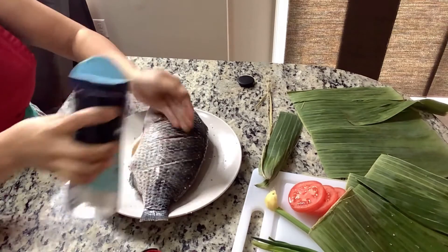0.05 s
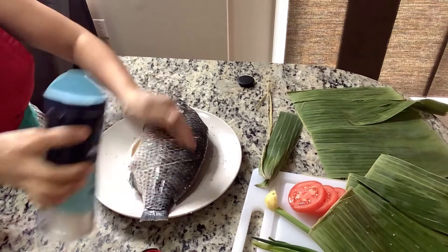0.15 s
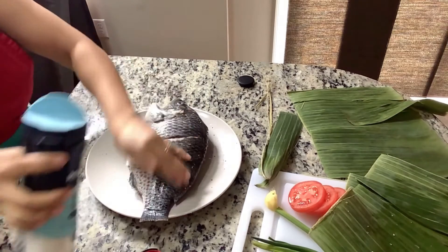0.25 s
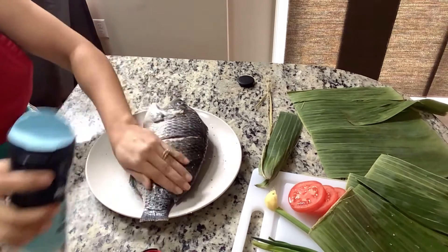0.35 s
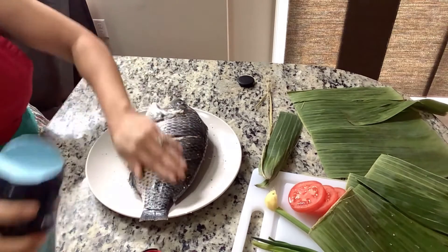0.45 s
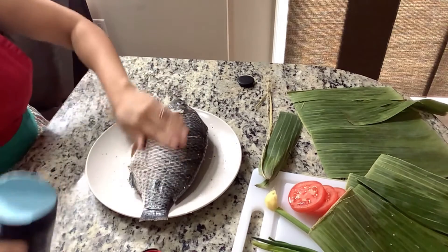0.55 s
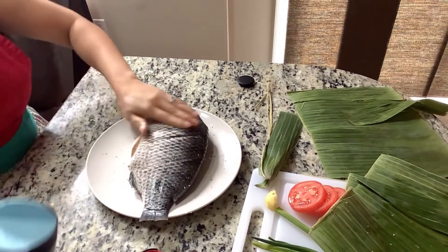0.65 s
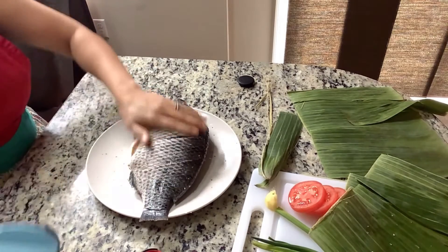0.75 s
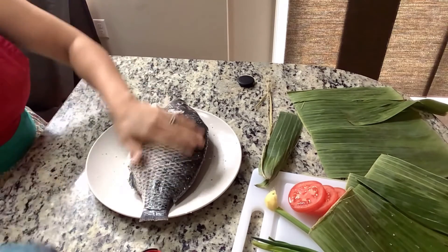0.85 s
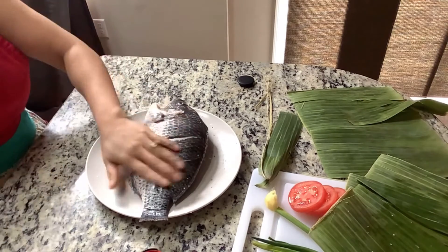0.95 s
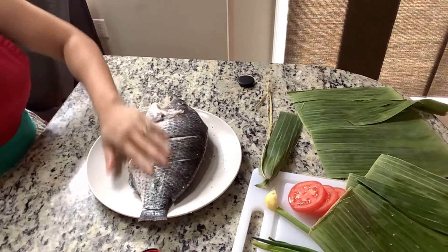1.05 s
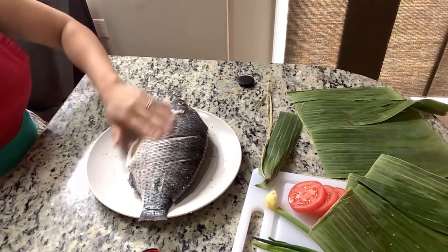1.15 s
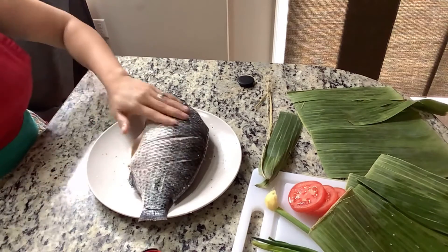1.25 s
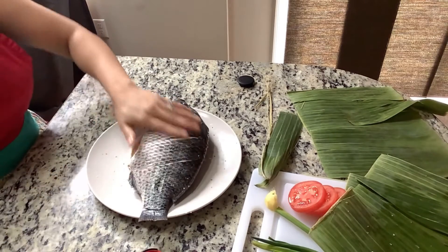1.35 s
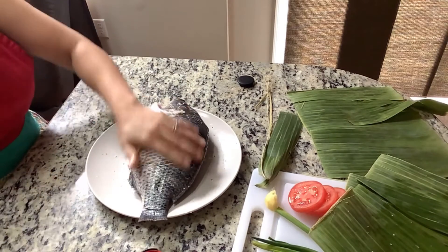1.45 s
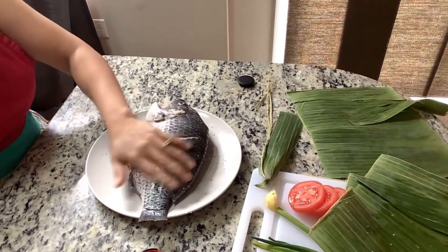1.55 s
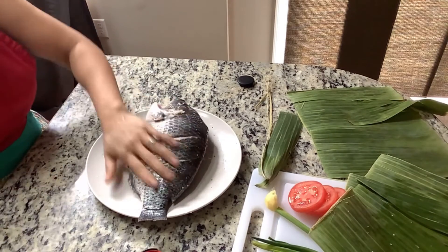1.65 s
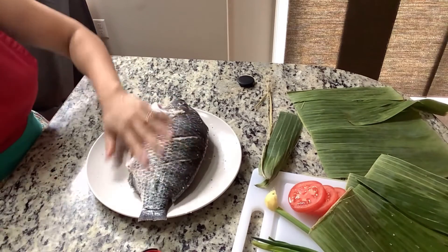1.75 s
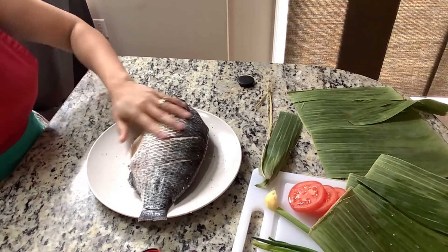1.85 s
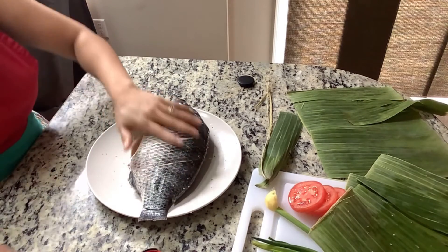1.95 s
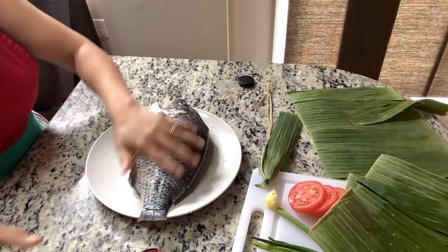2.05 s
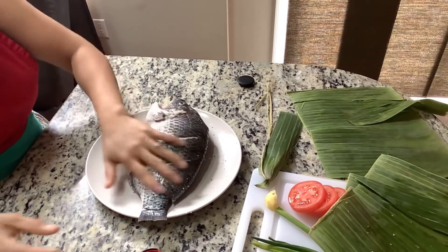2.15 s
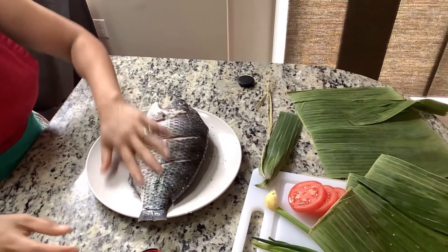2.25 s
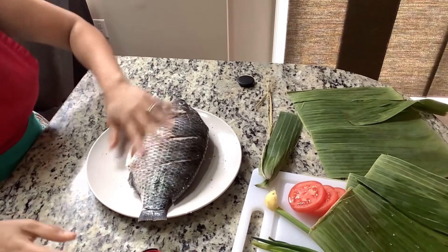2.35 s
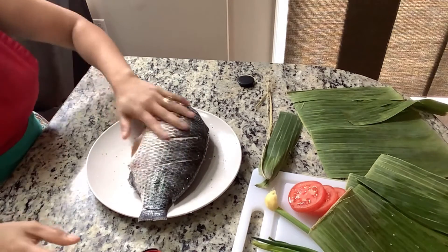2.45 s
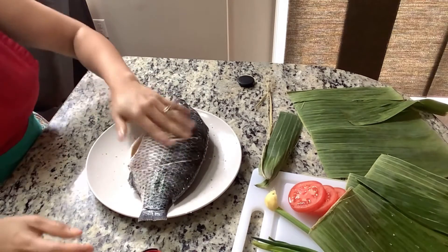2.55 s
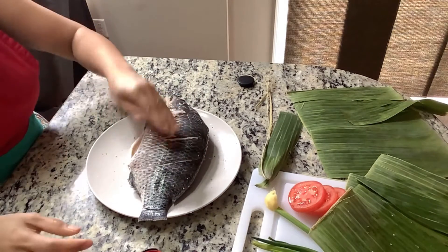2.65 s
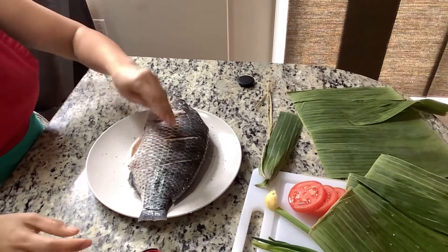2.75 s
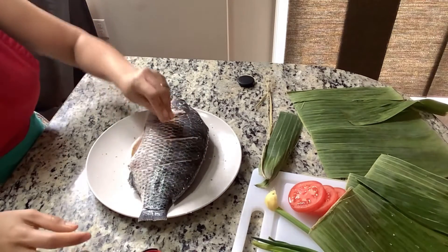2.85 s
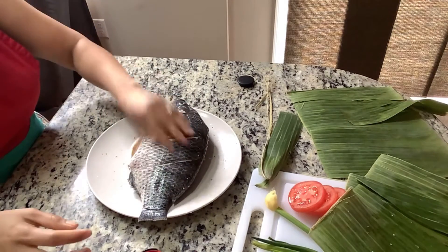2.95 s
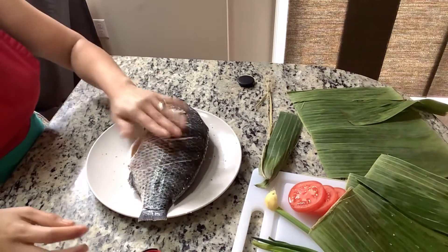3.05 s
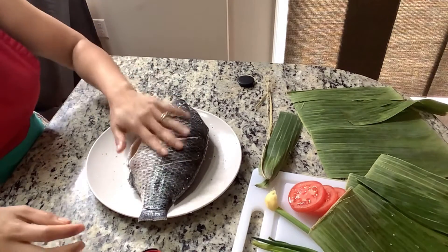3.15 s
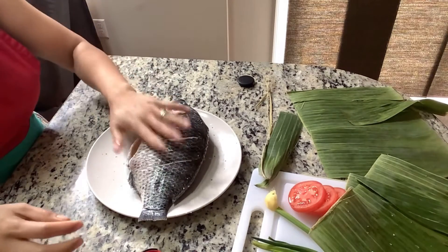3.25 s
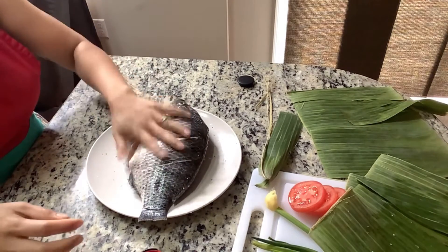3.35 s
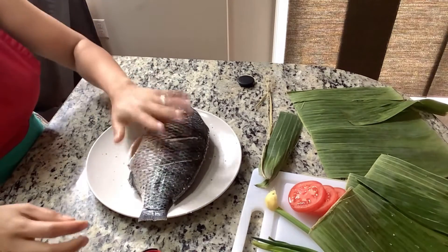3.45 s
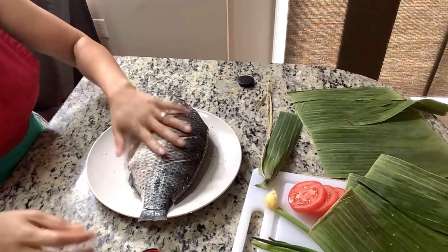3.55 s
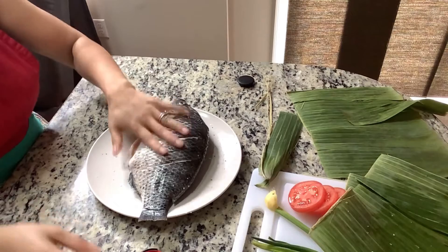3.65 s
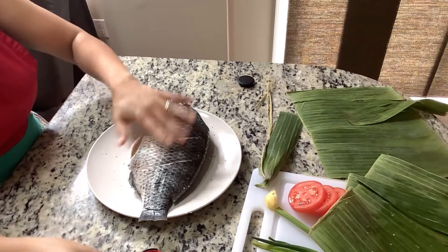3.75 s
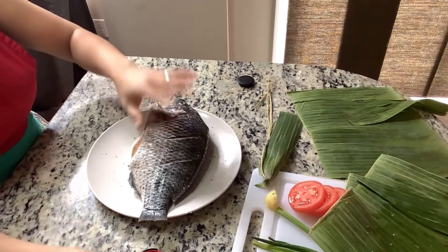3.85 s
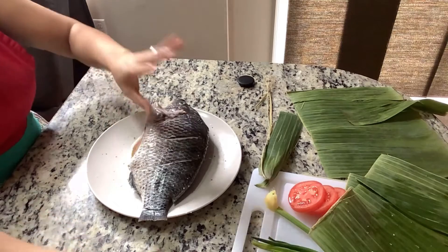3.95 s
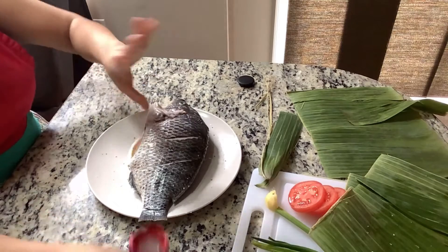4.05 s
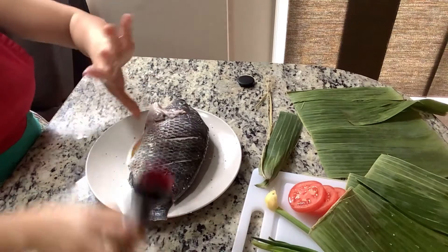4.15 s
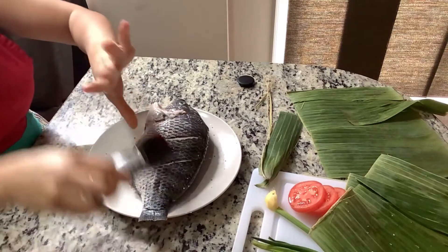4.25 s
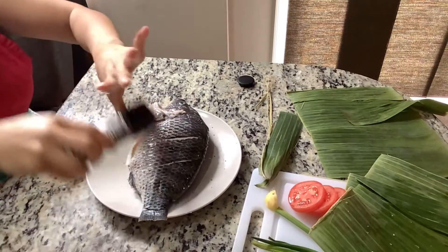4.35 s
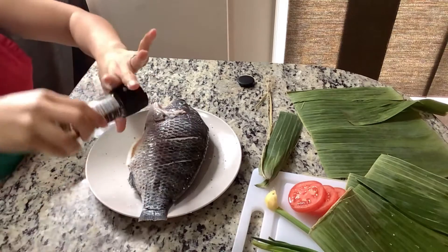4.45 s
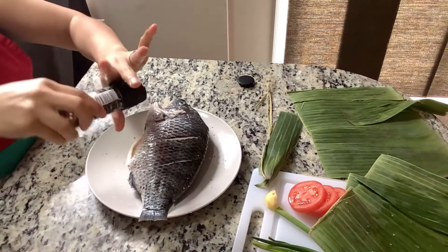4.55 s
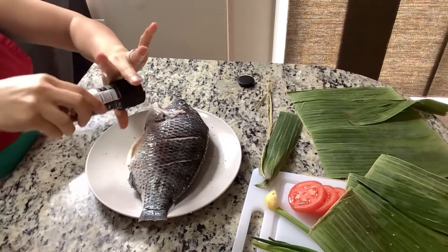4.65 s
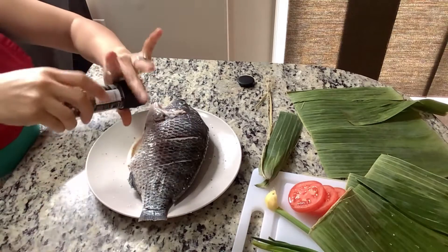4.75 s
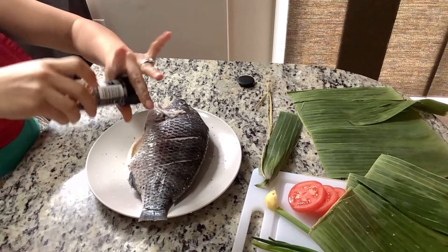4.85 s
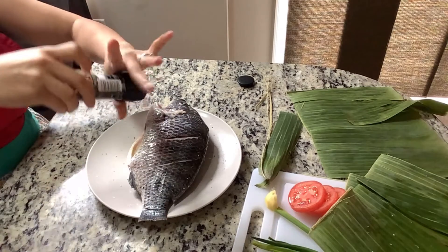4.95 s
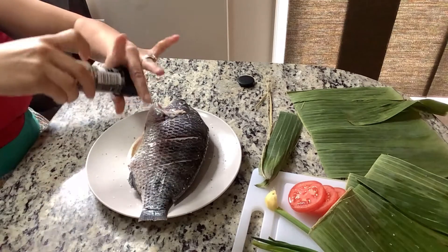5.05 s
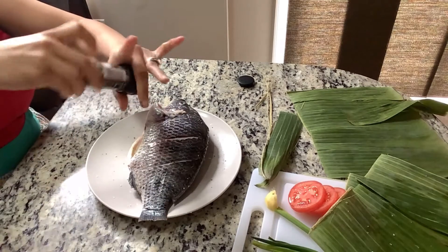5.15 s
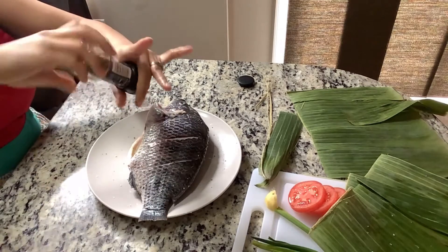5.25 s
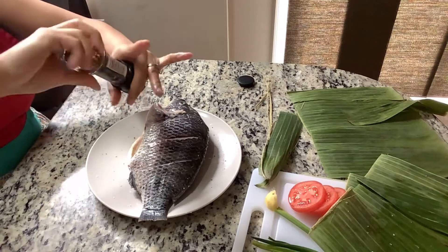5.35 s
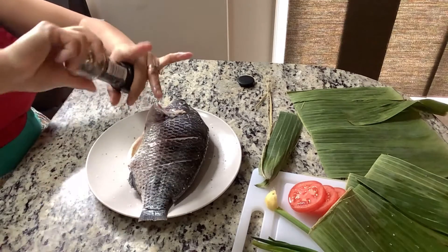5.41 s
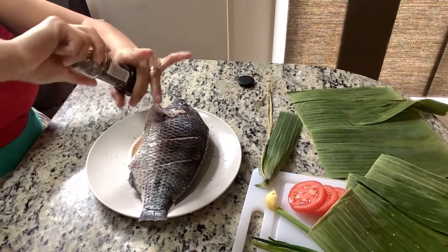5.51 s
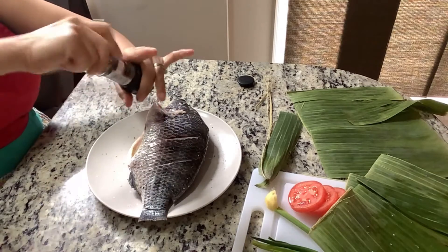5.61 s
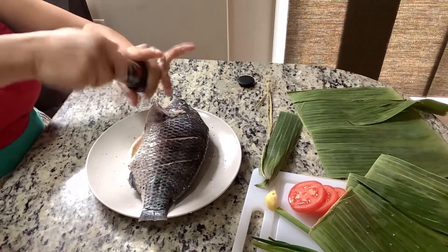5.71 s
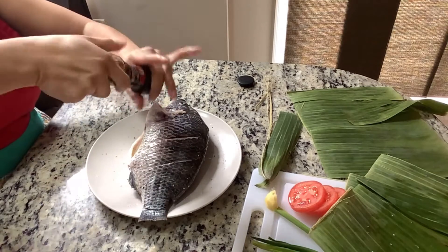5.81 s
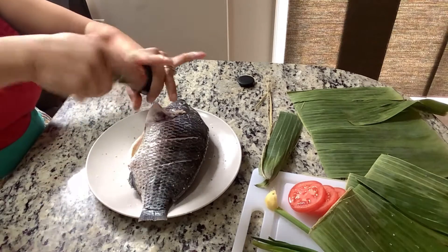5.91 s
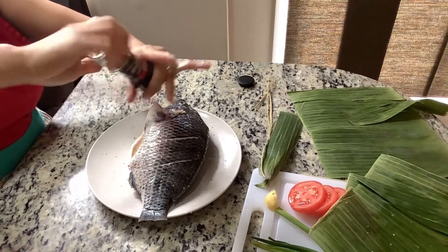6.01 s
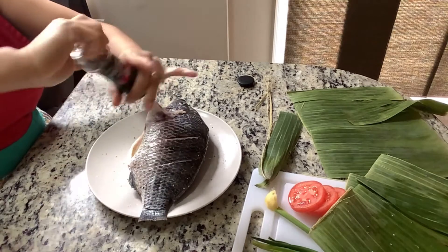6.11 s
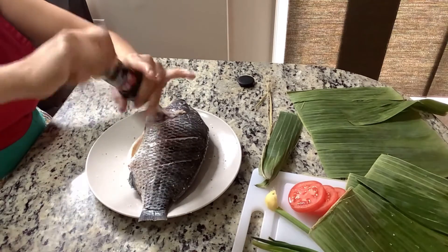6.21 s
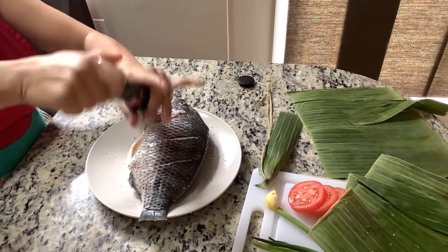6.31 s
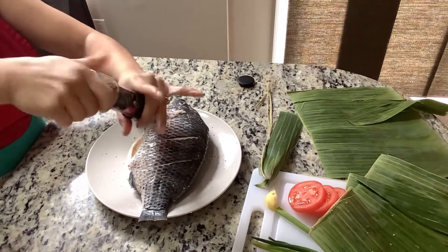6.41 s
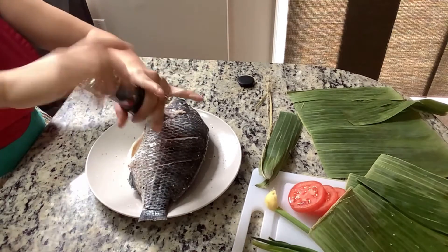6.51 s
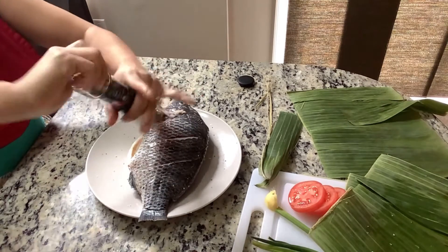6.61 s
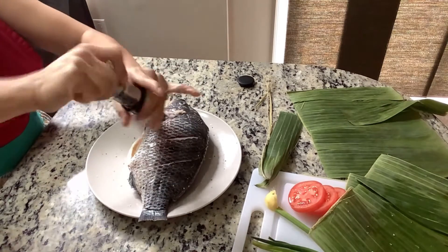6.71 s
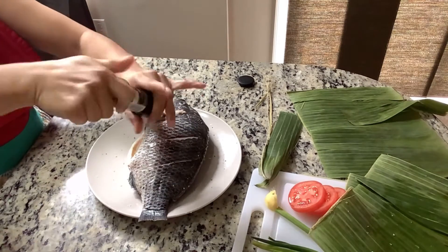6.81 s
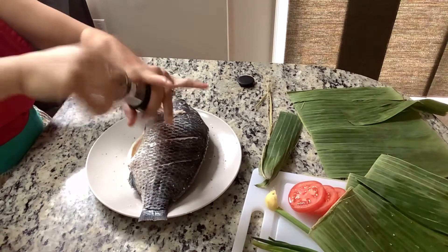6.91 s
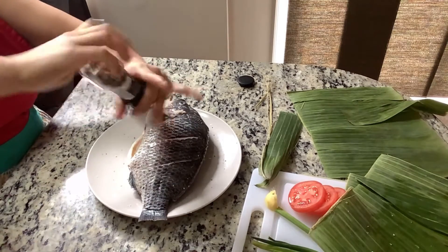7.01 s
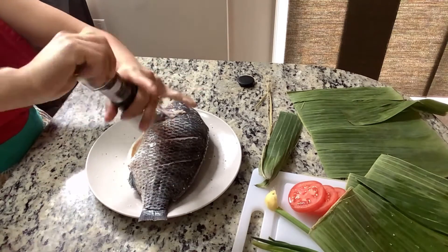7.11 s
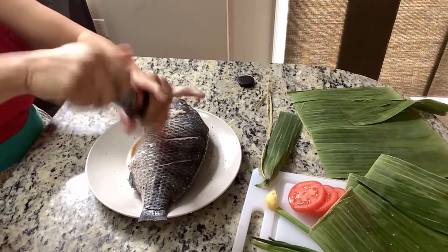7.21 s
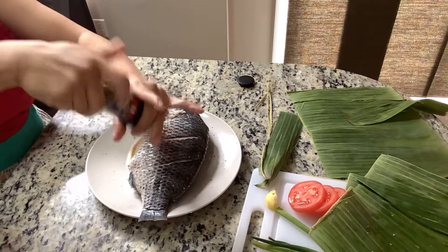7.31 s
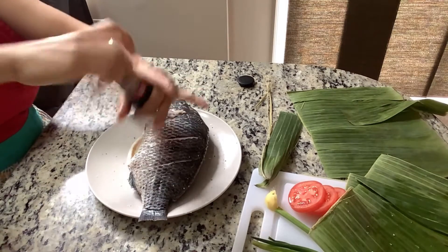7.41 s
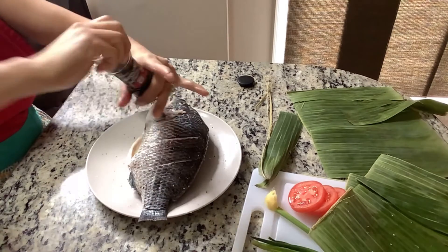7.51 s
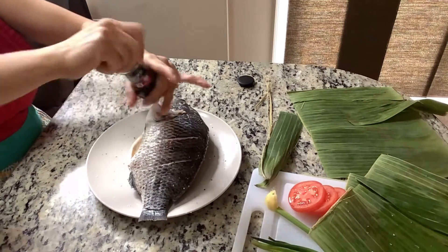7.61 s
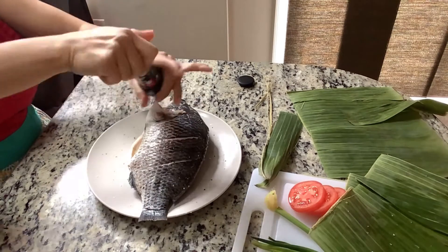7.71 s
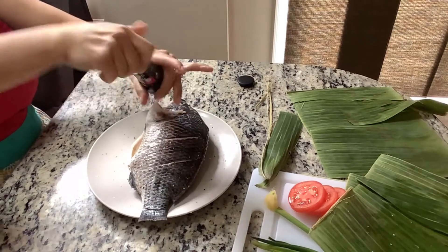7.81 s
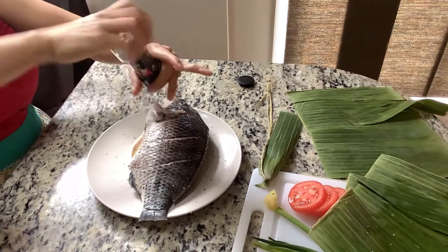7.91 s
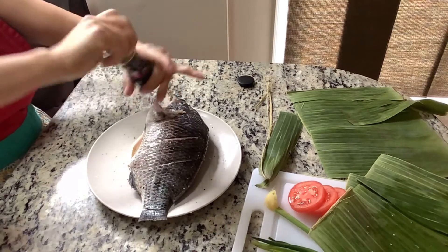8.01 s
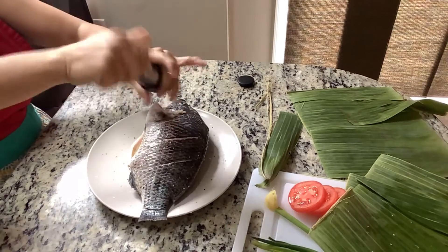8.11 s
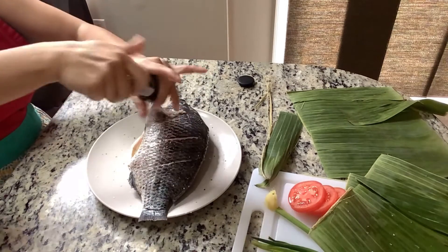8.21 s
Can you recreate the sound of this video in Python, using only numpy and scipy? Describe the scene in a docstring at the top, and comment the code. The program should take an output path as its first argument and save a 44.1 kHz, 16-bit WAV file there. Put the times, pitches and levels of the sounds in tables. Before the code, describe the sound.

A salt shaker rushes briefly, a hand pats and scratches over wet fish skin with small smacks, then a spice mill crunches in bursts, in a kitchen.

```python
"""A cook seasons a raw fish on a plate in a tiled kitchen, over wavering room air and an appliance's hum.
Salt grains trickle and rush down a shaker as it is swung upright, beside the first soft pats of damped noise.
Then a hand rubs and pats the wet skin: it squeaks, scratches over salted scales, smacks loose; things knock softly.
Last a spice mill turns, three times faintly and six times hard: corns crack one by one and crumble,
and a loose part rings. Filtered noise echoes make the hard room ring after each sound."""
import sys
import numpy as np
from scipy import signal
from scipy.fft import rfft, irfft, next_fast_len
from scipy.io import wavfile
from scipy.ndimage import uniform_filter1d, map_coordinates

SR = 44100
rng = np.random.default_rng(int(sys.argv[2]) if len(sys.argv) > 2 else 0)


def output_pcm(signal):
    """Save a mono or channel-first signal as 16-bit PCM at the path in sys.argv[1].

    Samples are clipped to [-1, 1] before scaling.
    """
    pcm = np.clip(np.atleast_2d(signal).T, -1, 1) * 32767
    wavfile.write(sys.argv[1], SR, np.round(pcm).astype(np.int16))


N = 364703

# turns of the mill; the grip sets which part rings:
# start_s, end_s, crumbling_db, ring_hz, ring_db (relative, trimmed in ringing)
MILL_TURNS = [(4.278, 4.338, -56.5, 1950, 0), (4.951, 5.049, -69, 2170, 16.5),
              (5.205, 5.342, -61, 2720, 14), (5.541, 5.705, -39.5, 2900, -4),
              (6.192, 6.292, -37, 4850, 10.5), (6.658, 6.821, -37.5, 3240, -17),
              (7.137, 7.266, -37.5, 9075, -19), (7.583, 7.686, -33, 1680, 6),
              (8.053, 8.177, -33.5, 2920, -6)]
# relative spectrum of a corn snapping: frequency_hz, gain_db
SNAP_SPECTRUM = [(200, -23.5), (700, -41), (1400, -19.5), (3000, -5), (5500, -2), (8800, 0), (12000, -2.5),
                 (15500, -9.5), (17000, -37.5)]


def amp(db):
    """Decibels to gain."""
    return 10 ** (np.asarray(db) / 20)


def unit(x):
    """Scale to rms 1."""
    return x / np.sqrt(np.mean(x ** 2) + 1e-20)


def along(points, hz):
    """Read (Hz, value) points on a log frequency axis."""
    f, v = np.transpose(points)
    return np.interp(np.log(hz + 1), np.log(f), v)


def shape(points):
    """Gain over frequency from (Hz, dB) points."""
    return lambda f: amp(along(points, f))


def peak(f, hz, width):
    """Gain of one resonance, width in Hz."""
    return f * width / np.hypot(hz * hz - f * f, f * width)


def modes(f, table):
    """Gain of a body with several resonances, summed by power."""
    return np.sqrt(sum((amp(db) * peak(f, hz, width)) ** 2 for hz, width, db in table))


def colour(x, gain):
    """Causal minimum-phase filter with the given gain over frequency, by folding the cepstrum."""
    m = 2 * next_fast_len(len(x))
    cepstrum = irfft(np.log(np.maximum(gain(np.fft.rfftfreq(m, 1 / SR)), 1e-6)))
    cepstrum[1:m // 2] *= 2
    cepstrum[m // 2 + 1:] = 0
    response = np.exp(rfft(cepstrum))
    return irfft(rfft(x, m) * response, m)[:len(x)]


def burst(life, steep=1):
    """A puff of noise that swells for about life seconds and dies, its spectrum partly evened out."""
    u = np.arange(SR // 4) / SR / life
    z = rfft(u * np.exp(-u ** steep) * rng.standard_normal(len(u)))
    return irfft(z / np.abs(z) ** .6)[:SR // 8]


def sized(x, life):
    """Scale a blow of that life to a peak near 1, by its energy."""
    return x / np.sqrt(np.sum(x ** 2) / (life * SR)) / 2


def grains(rate, spread_db):
    """Random tiny impacts of uneven size, rate a second."""
    hits = rng.random(N) < rate / SR
    size = amp(spread_db * np.clip(rng.standard_normal(N), -2, 2))
    return hits * rng.standard_normal(N) * size


def add(track, s, x):
    """Mix x into the track at s seconds."""
    part = track[max(round(s * SR), 0):][:len(x)]
    part += x[:len(part)]


def swell(middle, width):
    """A smooth rise and fall of gain around middle seconds."""
    return np.exp(-((np.arange(N) / SR - middle) / width) ** 2)


def scattered(start, end, rate, count=16):
    """Up to count moments, one at random in each 1/rate seconds: rows (s, a normal draw)."""
    place, draw = rng.random(count), rng.standard_normal(count)
    times = start + (np.arange(count) + place) / rate
    return [(s, z) for s, z in zip(times, draw) if s < end]


def patchy(x, depth_db, size=5):
    """Let each narrow band of x swell and fade on its own, for a few hundredths of a second."""
    z = signal.stft(x, nperseg=256)[2]
    across_bands = uniform_filter1d(rng.standard_normal(z.shape), size, 0)
    field = uniform_filter1d(across_bands, 2 * size, 1)
    return signal.istft(z * amp(depth_db * unit(field)), nperseg=256)[1][:N]


def blows(rows, life, breadth):
    """Damped blows (s, dB, Hz), each noise through one broad resonance, cubed for steep skirts."""
    out = np.zeros(N)
    for s, db, hz in rows:
        blow = colour(burst(life), lambda f: peak(f, hz, breadth * hz) ** 3)
        add(out, s, amp(db) * sized(blow, life))
    return out


def background(air_db=-66, waver_db=2, waver_rate_hz=7):
    """Room air whose rumble below 500 Hz wavers, and an appliance's hum and thin whine."""
    # relative spectrum of the room air: frequency_hz, gain_db
    air_spectrum = [(25, -38.5), (38, -41.5), (50, -3), (70, -3), (116, -7.5), (180, -9.5), (250, -11),
                    (400, -10.5), (650, -18), (1500, -27), (3500, -28), (8000, -30), (13000, -31),
                    (15800, -39)]
    # appliance hum and whine: pitch_hz, width_hz (of the resonance before it is squared), level_db (rms)
    appliance = [(150.9, 13, -71), (3620, 78, -84)]
    air = amp(air_db) * unit(colour(rng.standard_normal(N), shape(air_spectrum)))
    rumble = signal.sosfiltfilt(signal.butter(2, 500, fs=SR, output="sos"), air)
    waver = map_coordinates(rng.standard_normal(200), [np.arange(N) / SR * waver_rate_hz], mode="mirror")
    hum = np.zeros(N)
    for hz, width, db in appliance:
        hum += amp(db) * unit(colour(rng.standard_normal(N), lambda f: peak(f, hz, width) ** 2))
    return air + rumble * (amp(waver_db * waver) - 1) + hum


def shaker():
    """Thousands of salt grains slide along the shaker's wall: a trickle, a rush, then rest."""
    # relative spectrum of salt on the wall: frequency_hz, gain_db
    salt_spectrum = [(300, -16.5), (900, -24.5), (1500, -23), (2500, -15.5), (3600, -7), (4700, -8.5),
                     (6800, -2), (8600, -2.5), (11000, -6), (15000, -11), (15800, -30)]
    slide_db, growth_db_per_s = -44, 34  # salt begins to slide as the shaker tilts
    rush_s, rush_db, rush_width_s = 0.19, -29.5, .042  # then the bulk rushes down
    settle_s, settle_db_per_s = .25, 450  # and comes to rest
    t = np.arange(N) / SR
    growth = growth_db_per_s * np.minimum(t, settle_s)
    settling = settle_db_per_s * np.maximum(t - settle_s, 0)
    trickle = amp(slide_db + growth - settling)
    flow = np.hypot(trickle, amp(rush_db) * swell(rush_s, rush_width_s))
    return flow * unit(colour(grains(rate=14000, spread_db=1.5), shape(salt_spectrum)))


def pats():
    """Soft pats on the flesh: short noise blows through one very broad, mostly low resonance."""
    # soft pats: start_s, level_db (approximate peak), pitch_hz
    soft_pats = [(.135, -36.5, 187), (.155, -30.5, 102), (1.022, -33, 350), (1.033, -36.5, 99),
                 (1.10, -44, 94.5), (1.248, -39.5, 280), (3.0, -46, 205), (3.125, -46, 107),
                 (3.527, -47, 163), (3.955, -46, 303), (5.328, -50, 345), (5.875, -48.5, 262)]
    return blows(soft_pats, life=0.004, breadth=1.48)


def squeaks():
    """Skin sticks and slips in short narrow chirps: the clear ones and a scatter of faint ones."""
    # skin sticking and slipping, on the fish or the mill: start_s, level_db (approximate peak), pitch_hz
    clear = [(.41, -52, 1460), (.428, -50, 3480), (.55, -51, 6430), (.972, -47.5, 6700), (.992, -51, 1510),
             (1.085, -54.5, 1550), (1.615, -56.5, 2750), (1.655, -60, 2640), (3.83, -53.5, 7540),
             (4.241, -44, 9700), (4.932, -52, 10200), (5.285, -44, 9300), (5.322, -44, 10000),
             (6.018, -56.5, 10100), (6.165, -54, 3070), (8.035, -47.5, 9900)]
    # faint slips while the palm first spreads the salt
    slip_db, slip_hz, scatter_octaves = -59.5, 4270, 0.56
    moments = scattered(start=0.35, end=.8, rate=24)
    slips = [(s, slip_db, slip_hz * 2 ** (scatter_octaves * z)) for s, z in moments]
    return blows(clear + slips, life=0.0098, breadth=0.28)


def rubbing(contact_db=-77, stroke_trim_db=-2):
    """Salt scratches over the scales under the palm, swelling with each stroke, its bands rasping unevenly."""
    # strokes of the palm over salted scales: middle_s, level_db (before the trim), half_length_s
    strokes = [(0.524, -58, 0.073), (0.852, -55.5, 0.069), (1.029, -48.5, 0.049), (1.185, -50, 0.015),
               (1.503, -66, .02), (1.657, -56, 0.053), (1.761, -59, 0.011), (1.952, -48.5, 0.02),
               (2.242, -59, .035), (3.369, -47.5, 0.017), (3.649, -44, 0.0086)]
    # relative spectrum of the scratching: frequency_hz, gain_db
    scale_spectrum = [(400, 5), (1500, -6.5), (2500, -11), (5000, -8.5), (8000, 4.5), (12000, 6.5),
                      (15500, 3)]
    t = np.arange(N) / SR
    effort = amp(contact_db) * ((t > .4) & (t < 2.5))  # a light drag under and between the strokes
    for s, db, width in strokes:
        effort += amp(stroke_trim_db + db) * swell(s, width)
    scratch = colour(grains(rate=3300, spread_db=5.0), shape(scale_spectrum))
    return effort * unit(patchy(scratch, depth_db=3.5))


def smacks(life=0.00049, peel_life=0.0076, plate_life=0.016, peel_db=-12, film_db=10, film_width=900):
    """A wet film snaps, peels off in a short fizz and lets the plate ring dully (lives in s, width in Hz)."""
    # wet skin letting go of the fingers, levels as approximate peaks:
    # start_s, click_db, low_smack_db, film_pitch_hz, plate_db
    releases = [(1.0211, -45, -38.5, 9000, -56), (1.1869, -27.5, -26, 3400, -52.5),
                (1.239, -36, -68, 4940, -53), (1.935, -36.5, -68, 13000, -58),
                (3.1326, -31.5, -47.5, 6060, -63), (3.354, -36.5, -45, 5850, -51.5),
                (3.526, -24.5, -38.5, 5540, -43), (3.638, -22.5, -51, 12100, -63),
                (5.322, -44, -35.5, 2700, -74)]
    # relative spectrum of the wet film: frequency_hz, gain_db
    wet_spectrum = [(500, -0.5), (2000, -22), (4000, -3), (5600, -0.5), (8000, 1.5), (12500, 0), (15500, 0),
                    (17000, -25)]
    # relative spectrum of the low smack: frequency_hz, gain_db
    smack_spectrum = [(150, -46.5), (450, -23), (700, -4), (950, -2.5), (1300, -3), (3000, -1.5),
                      (6000, -18), (12000, -37.5)]
    # the plate under the fish, before its gain is squared: pitch_hz, width_hz, gain_db
    plate_modes = [(475, 120, 0), (890, 140, 2), (1430, 180, -12)]
    out = np.zeros(N)
    for s, db, smack_db, hz, plate_db in releases:
        def film(f):
            """The wet spectrum with a peak at the film's pitch, dull far above it."""
            lift = 1 + amp(film_db) * peak(f, hz, film_width)
            return shape(wet_spectrum)(f) * lift / (1 + (f / (4 * hz)) ** 4)

        click = amp(db) * sized(colour(burst(life), film), life)
        smack = amp(smack_db) * sized(colour(burst(2 * life), shape(smack_spectrum)), 2 * life)
        peel = amp(db + peel_db) * sized(colour(burst(peel_life), film), peel_life)
        clank = colour(burst(plate_life), lambda f: modes(f, plate_modes) ** 2)
        add(out, s, click + smack + peel + amp(plate_db) * sized(clank, plate_life))
    return out


def knocks():
    """Dull knocks and squelches: brief noise blows through one broad middle resonance."""
    # knocks and squelches: start_s, level_db (approximate peak), pitch_hz
    dull_knocks = [(1.847, -43.5, 860), (1.92, -51, 880), (1.988, -51, 920), (2.513, -45, 1010),
                   (3.908, -41, 1000), (3.923, -38.5, 1190), (3.942, -34.5, 770), (3.959, -33.5, 710),
                   (3.961, -35, 1400)]
    return blows(dull_knocks, life=0.0022, breadth=0.88)


def housing(f):
    """Gain of the mill's hollow body: its resonances, rolled off above 6 kHz."""
    # the mill's resonances, before the roll-off: pitch_hz, width_hz, gain_db
    resonances = [(332, 110, -15), (1493, 95, -1.5), (1763, 180, -2.5), (2180, 260, -3.5), (2710, 260, 2.5),
                  (3057, 180, 4), (3404, 850, 1), (4260, 82, 8), (4890, 630, 3)]
    return modes(f, resonances) / (1 + (f / 6000) ** 4)


def crumbs(edge=0.0092, body_db=-3):
    """While the mill turns, fragments are crushed in small clumps; edge is the fade at each end in s."""
    t = np.arange(N) / SR
    turning = np.zeros(N)
    for start, end, db, _, _ in MILL_TURNS:
        turning += amp(db) * np.clip((t - start) / edge, 0, 1) * np.clip((end - t) / edge, 0, 1)
    clump_decay = np.exp(-1 / (0.0011 * SR))
    clumps = signal.lfilter([1], [1, -clump_decay], np.abs(grains(rate=460, spread_db=0.5)))
    grit = clumps * rng.standard_normal(N)
    bright = unit(colour(grit, shape(SNAP_SPECTRUM)))
    return turning * (bright + amp(body_db) * unit(colour(grit, housing)))


def chips(snap_db=13.5, housing_db=9.5, spread_db=1.5):
    """Small corns break all through a turn, louder the harder it grinds (dB over the crumbling)."""
    rows = []
    for start, end, db, _, _ in MILL_TURNS:
        # they start once the burrs have bitten
        for s, z in scattered(start + .012, end, rate=50):
            rows.append((s, db + snap_db + spread_db * z, db + housing_db + spread_db * z))
    return rows


def cracks(snap_trim_db=-3, pitch_width=1500, pitch_db=4):
    """Each corn snaps between the burrs at its own pitch and jolts the housing."""
    # loud corns breaking in the mill: start_s, snap_db (before the trim), housing_db
    loud_corns = [(5.2187, -39, -43.5), (5.5313, -26, -32), (5.5503, -22, -18.5), (5.5827, -11.5, -19.5),
                  (5.6063, -13.5, -13.5), (5.6347, -9.5, -24), (5.6717, -19.5, -15.5), (5.7008, -8.5, -13),
                  (5.7183, -3.5, -22), (5.7318, -14, -17), (6.186, -24, -34), (6.1974, 0.5, -9),
                  (6.2034, -13.5, -27), (6.2139, -13.5, -21.5), (6.2278, -19.5, -21), (6.2598, -13, -27),
                  (6.2742, -10, -24), (6.298, -10, -38), (6.6608, -15, -27.5), (6.699, -12, -21),
                  (6.7264, -12.5, -28), (6.7601, -8.5, -18.5), (6.7661, -7, -18.5), (6.7715, -6, -13.5),
                  (6.7985, -4.5, -15.5), (7.1261, -27, -41.5), (7.1421, -4, -22), (7.191, -15, -30),
                  (7.2076, 1, -17.5), (7.2151, 0, -14), (7.5659, -13, -19), (7.5936, -3.5, -9.5),
                  (7.6123, -19, -17), (7.6458, -0.5, -4.5), (7.6517, -14.5, -14.5), (7.6822, -3.5, -13.5),
                  (8.0591, -15, -18.5), (8.0679, -7, -21), (8.0789, -9, -11), (8.0937, -7, -10.5),
                  (8.1146, -27, -26), (8.1642, -10.5, -30)]
    snap_hz, scatter_octaves = 9180, 0.077  # pitch, and how it differs from corn to corn
    life, body_life = .0013, .0015  # s
    rows = [(s, snap_trim_db + bright_db, hollow_db) for s, bright_db, hollow_db in loud_corns]
    out = np.zeros(N)
    for s, bright_db, hollow_db in rows + chips():
        hz = snap_hz * 2 ** (scatter_octaves * rng.standard_normal())

        def corn(f):
            """The snap spectrum with a peak at this corn's pitch."""
            return shape(SNAP_SPECTRUM)(f) * (1 + amp(pitch_db) * peak(f, hz, pitch_width))

        snap = colour(burst(life, steep=2), corn)
        body = colour(burst(body_life, steep=2.02), housing)
        add(out, s, amp(bright_db) * sized(snap, life) + amp(hollow_db) * sized(body, body_life))
    return out


def ringing(x, trim_db=-7, t60=0.3):
    """In each turn one loose part of the mill, driven by the crunch x, rings on after it."""
    out, t = np.zeros(N), np.arange(N) / SR
    decay = amp(-60 * t[:SR // 2] / t60)
    for start, end, _, hz, ring_db in MILL_TURNS:
        jangle = rng.standard_normal(len(decay)) * decay / np.linalg.norm(decay)
        ring = colour(jangle, lambda f: peak(f, hz, hz / 4) ** 2)
        crunch = x[(t >= start) & (t < end)]
        add(out, start, amp(trim_db + ring_db) * signal.fftconvolve(crunch, ring))
    return out


def echoes(wet_db, early_db, early_life=0.012):
    """Quick echoes off the counter, then the room's tail, each decaying noise."""
    # reverberation of the tiled kitchen: frequency_hz, t60_s
    room_decay = [(150, 0.49), (530, 0.45), (1500, 0.55), (4500, 0.46), (9000, 0.39), (12000, 0.31),
                  (15500, 0.34)]
    hz, t, z = signal.stft(rng.standard_normal(SR * 3 // 4), SR, nperseg=256)
    decay = amp(-60 * t / along(room_decay, hz)[:, None])
    tail = signal.istft(z * decay, SR, nperseg=256)[1]
    t = np.arange(len(tail)) / SR
    tail = tail * (1 - np.exp(-t / 0.0028))  # the tail builds up softly
    early = rng.standard_normal(len(t)) * np.exp(-t / early_life) * (t > .002)
    return amp(wet_db) * tail / np.linalg.norm(tail) + amp(early_db) * early / np.linalg.norm(early)


def kitchen(x, wet_db, early_db, count=5):
    """The hands keep moving, so x crossfades through count echo patterns in turn, one every 11 ms."""
    place = np.arange(N) / SR / .011 % count
    out = x
    for k in range(count):
        share = np.sin(np.pi / 2 * np.minimum((place - k) % count, 2))
        out = out + signal.oaconvolve(x * share, echoes(wet_db, early_db))[:N]
    return out


def scene():
    """Shaker, hands and mill, all in the same room, over its air and hum."""
    salt_and_skin = kitchen(shaker() + squeaks() + rubbing(), wet_db=-6.0, early_db=-5)
    touches = kitchen(pats() + smacks() + knocks(), wet_db=-5.5, early_db=-3.0)
    crunch = crumbs() + cracks()
    mill = kitchen(crunch + ringing(crunch), wet_db=-4.5, early_db=-4.5)
    return (background() + salt_and_skin + touches + mill)[None]


def record(dry):
    """The recorder cuts the deepest bass, around 50 Hz and below, and fades out treble at its band limit."""
    top_hz, fade_hz = 16000, 400
    m = next_fast_len(N + SR)
    hz = np.fft.rfftfreq(m, 1 / SR)
    treble_limit = np.clip((top_hz - hz) / fade_hz + .5, 0, 1)
    bass_cut = 1 - np.exp(-(hz / 50) ** 6)
    return irfft(rfft(dry, m) * treble_limit * bass_cut, m)[..., :N]


dry = scene()
out = record(dry)
output_pcm(out)
```